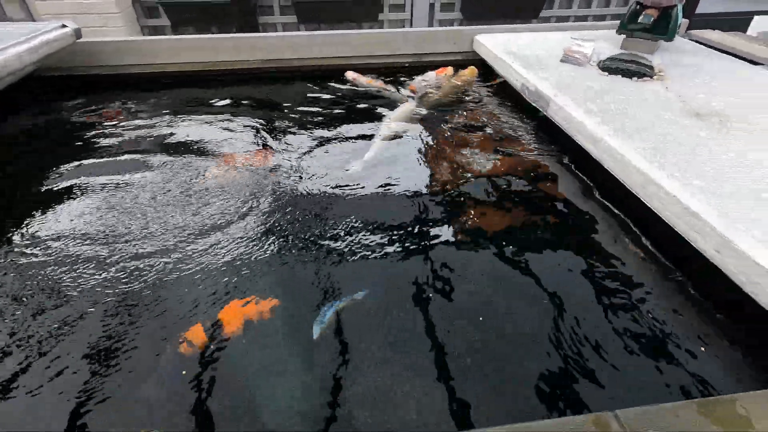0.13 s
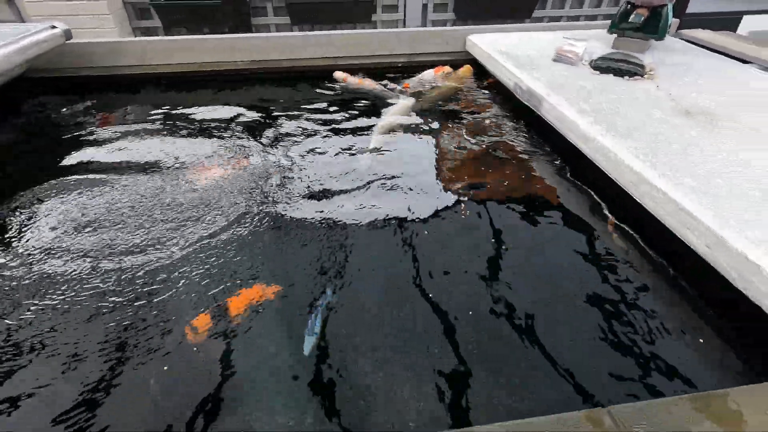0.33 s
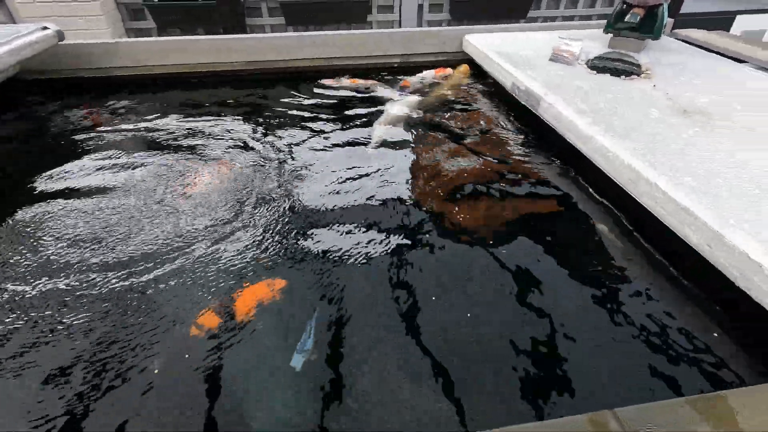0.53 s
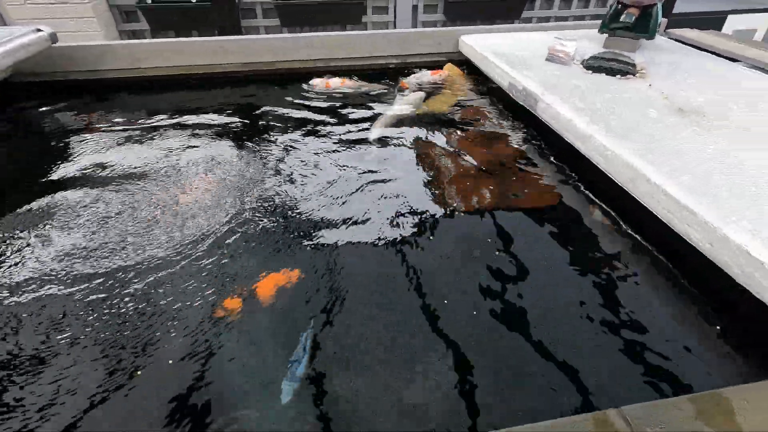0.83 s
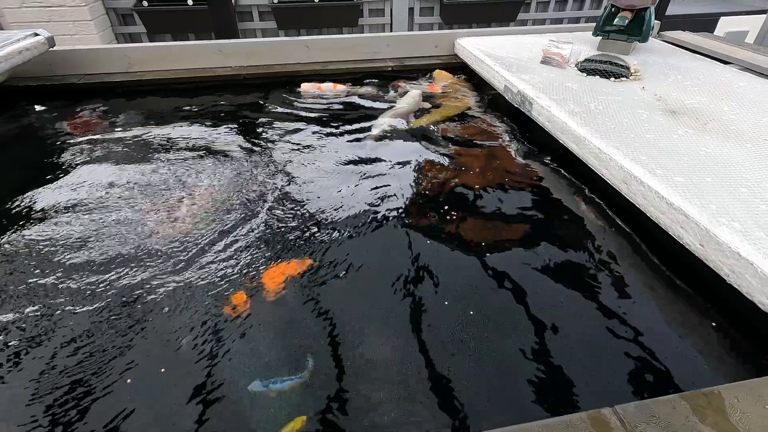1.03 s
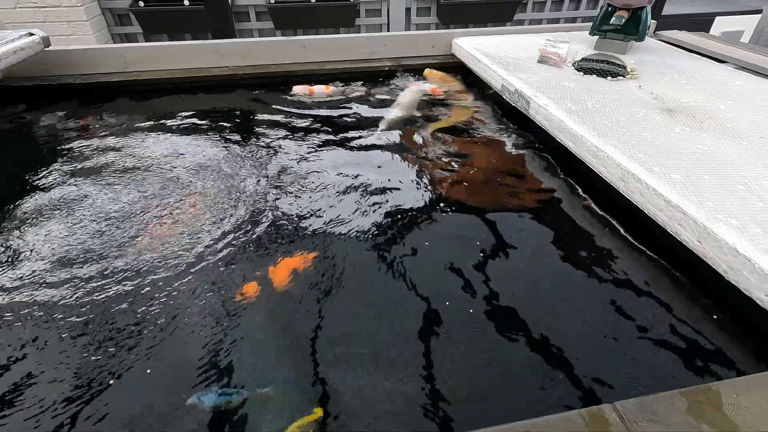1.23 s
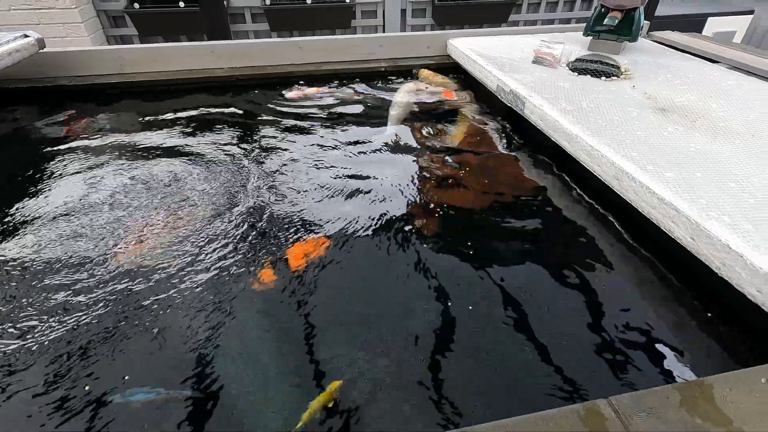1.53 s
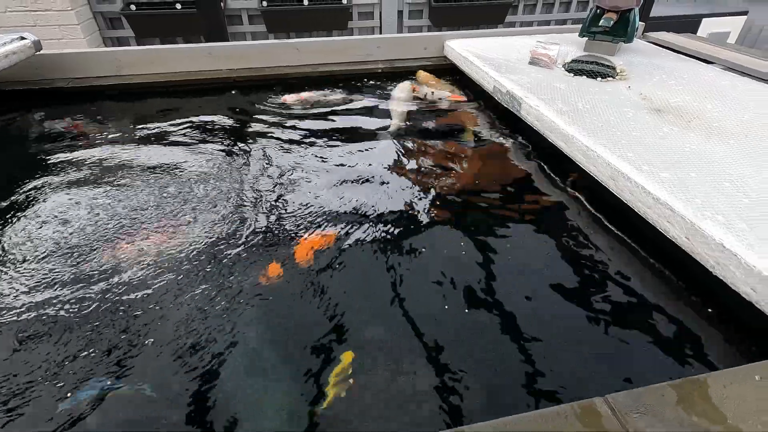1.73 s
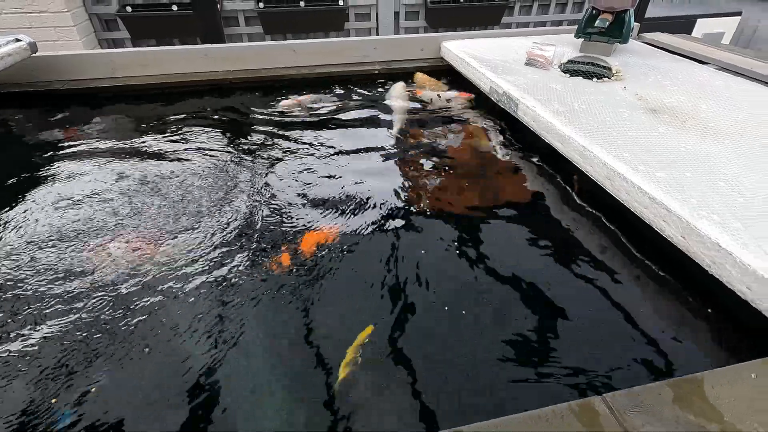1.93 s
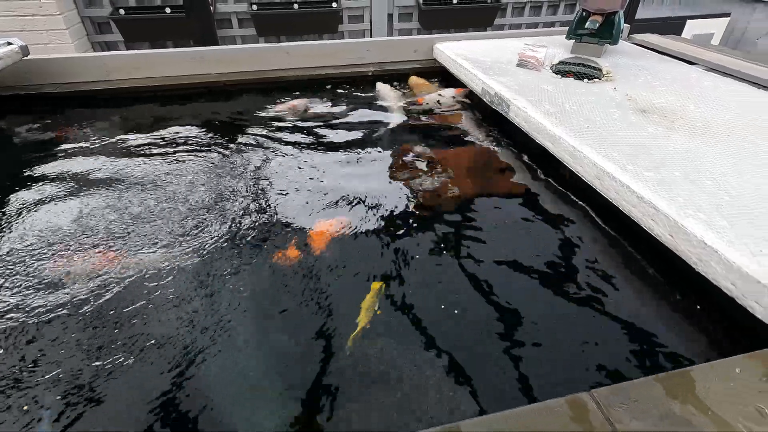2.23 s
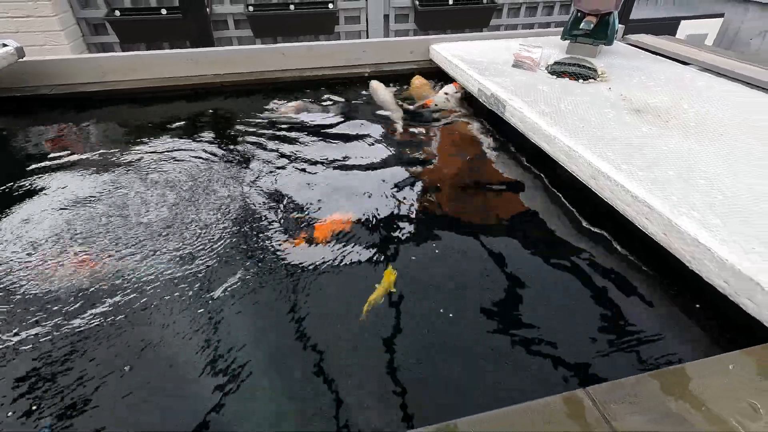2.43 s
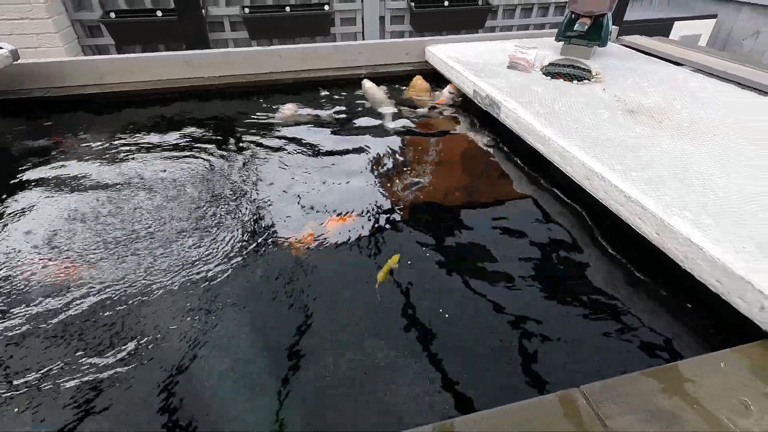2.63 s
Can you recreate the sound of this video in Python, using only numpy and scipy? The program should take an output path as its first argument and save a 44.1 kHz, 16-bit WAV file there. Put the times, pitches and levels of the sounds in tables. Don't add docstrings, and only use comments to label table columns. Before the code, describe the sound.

Fish gulp and flick at a pond surface, making ringing bubbly plops and small splashes, busiest in the first second with one sharp slap, then sparser, over constant trickling and pump hum; close outdoor stereo microphone.

```python
import sys
import numpy as np
from scipy import signal
from scipy.fft import rfft, irfft, next_fast_len
from scipy.io import wavfile
from scipy.ndimage import uniform_filter1d, map_coordinates

SR = 44100
rng = np.random.default_rng(int(sys.argv[2]) if len(sys.argv) > 2 else 0)


def makeup_ratio(level_db):
    decades = np.asarray(level_db, float) / 20
    return 10 ** decades


def digitize_waveform(pressure):
    field = np.atleast_2d(pressure).T
    bounded = np.clip(field, -1, 1)
    quanta = np.round(bounded * 32767).astype(np.int16)
    wavfile.write(sys.argv[1], SR, quanta)


N = 123479

# start in seconds, peak in dB, pitch in Hz.
GULPS = [(0.334, -27, 630), (0.496, -23.5, 488), (0.588, -32, 538), (0.634, -33, 457), (0.744, -29.5, 512),
         (0.863, -25.5, 523), (0.943, -28.5, 746), (.942, -29, 502), (.941, -30, 1007), (1.109, -35.5, 445),
         (1.171, -34, 557), (1.535, -26, 357), (1.96, -36, 543), (2.283, -37.5, 660), (2.641, -26, 677)]
# start in seconds, peak in dB, pitch in Hz, cycles to die.
PLOPS = [(0.047, -27.5, 1040, 25), (0.117, -21, 1290, 13), (0.254, -29.5, 994, 23), (0.309, -32, 1870, 69),
         (0.336, -20.5, 960, 8.9), (0.372, -23, 1242, 33), (0.422, -32.5, 981, 77), (0.447, -23.5, 995, 29),
         (0.543, -28.5, 1002, 37), (0.568, -25.5, 1050, 24), (0.624, -26.5, 1730, 48),
         (0.664, -28.5, 1450, 21), (0.771, -24.5, 1046, 24), (0.886, -27, 1217, 31), (0.912, -27, 1205, 32),
         (0.939, -26, 1930, 14), (0.943, -18.5, 1890, 35), (1.026, -27.5, 1630, 21), (1.106, -32, 984, 70),
         (1.226, -30, 1040, 31), (1.287, -23.5, 1390, 30), (1.441, -33.5, 1230, 43), (1.543, -27, 978, 32),
         (1.822, -30, 1224, 45), (2.284, -24, 938, 24), (2.704, -27, 1786, 42), (2.785, -34.5, 1960, 32)]
# start in seconds,
# peak in dB, pitch in Hz, cycles to die.
DROPS = [(0.118, -24, 3100, 9.7), (0.18, -40.5, 2810, 28), (0.3705, -34, 2590, 31), (0.4338, -24, 3320, 21),
         (0.4458, -27, 2900, 29), (0.4805, -37, 3480, 42), (0.8882, -35, 3470, 47),
         (0.9395, -6.5, 2810, 12.7), (1.1037, -35.5, 2780, 42), (1.3115, -28.5, 4560, 34),
         (1.3924, -27, 3480, 11), (1.396, -27.5, 2590, 39), (1.4216, -25.5, 2530, 57),
         (1.6558, -37.5, 3820, 44), (1.7785, -30, 2600, 12), (1.7918, -34, 4280, 40),
         (2.1888, -41, 4150, 36), (2.6456, -13.5, 3700, 15), (2.7278, -38, 4120, 40),
         (2.7555, -41, 2430, 51),
         (0.019, -42, 6700, 20), (0.0834, -43, 3230, 28), (0.2186, -37, 2600, 10), (.2304, -38, 2490, 30),
          (.2823, -36, 3830, 14), (.411, -40, 3710, 22), (0.417, -39, 5000, 36), (0.4253, -28.5, 2900, 20),
          (.447, -42, 8500, 30), (0.486, -38, 6800, 34), (.5177, -45, 3400, 48), (.604, -29.5, 4860, 8),
          (.647, -37, 4570, 27), (.712, -31, 6200, 27), (0.9372, -17, 2180, 9), (0.942, -22, 4620, 27),
          (0.9437, -12.5, 2500, 10.4), (0.948, -32, 4640, 20), (.957, -35, 3700, 20),
          (0.959, -41, 4900, 39), (.9655, -41, 2780, 16), (.9745, -38, 2450, 50), (1.071, -34, 5550, 16),
          (1.08, -37, 6800, 12), (1.1305, -38, 6040, 33), (1.141, -37.5, 7600, 20), (1.3394, -38, 2460, 14),
          (1.433, -37.5, 4970, 34), (1.6404, -37, 7500, 19), (1.704, -35.5, 6740, 14),
          (1.9059, -33.5, 6900, 20), (1.9927, -40, 3350, 25), (1.993, -45, 8900, 60),
          (2.0644, -33, 3300, 5.7), (2.1244, -39.5, 2610, 32), (2.1457, -38.5, 1700, 12),
          (2.245, -32, 5000, 12), (2.2712, -37.5, 6800, 18), (2.6565, -36, 3800, 16),
          (2.662, -46, 3720, 30), (2.669, -34, 7800, 22), (2.6785, -39, 1890, 40), (1.091, -31.5, 1400, 22),
          (1.73, -32, 855, 9.9), (2.244, -31, 900, 8.3), (2.409, -37, 900, 30), (2.731, -34.5, 1310, 7.9),
          (2.323, -37.5, 416, 16)]
# start in seconds, peak in dB, pitch in Hz.
TICKS = [
    (0.629, -22.5, 6350),
    (0.9392, -27.5, 7400),
    (1.7681, -34.5, 7577),
    (1.8942, -37, 7000),
    (2.622, -31, 11700),
]
# start in seconds, peak in dB, first pitch in Hz, last pitch in Hz,
# length in seconds.
GLIDES = [
    (0.34, -37, 720, 1050, 0.047),
    (1.171, -29.5, 970, 2060, 0.0172),
    (1.96, -42, 800, 1860, 0.044),
    (2.025, -41, 734, 1660, 0.036),
    (.53, -41, 1300, 1500, 0.09),
]
# start in seconds, peak in dB, first pitch in Hz, last pitch in Hz,
# length in seconds.
SWISHES = [
    (.66, -53, 4000, 4500, .14),
    (.69, -57, 3400, 3500, .08),
    (1.7, -56, 3000, 4300, .12),
]
# start in seconds, peak in dB, spray length in seconds, centre pitch in Hz.
SLAPS = [(.001, -37, 0.021, 1250), (0.229, -40.5, 0.11, 2096), (0.414, -41, 0.056, 2800),
         (0.625, -41, 0.048, 2230), (0.935, -27, 0.025, 1990), (1.172, -44.5, 0.05, 2500),
         (1.429, -43.5, 0.083, 1800), (1.543, -43, 0.04, 2080), (1.916, -38, 0.026, 1300),
         (2.277, -39.5, 0.037, 878), (2.588, -47.5, 0.044, 1330), (2.621, -48, 0.024, 1780),
         (2.142, -48, 0.033, 3000), (2.6397, -34, .011, 1200), (2.645, -38.5, 0.045, 2230)]
# frequency in Hz, level in dB per Hz.
SPRAY_COLOUR = [(1500, -120), (2500, -15), (4500, 4), (8000, -3), (13000, -5), (15500, -42)]
# time in seconds, level in dB.
STIR = [(0, -65.5), (.15, -57), (.3, -48), (.45, -47), (.52, -53.5), (.62, -49), (.9, -50), (1.3, -54),
        (1.9, -56.5), (2.5, -53), (2.8, -53.5)]
# count, centre pitch in Hz, pitch spread in octaves, cycles to die,
# level over the stir in dB, level spread in dB.
CROWDS = [(1200, 1147, 0.38, 30, -1, 3.8), (900, 3570, 0.61, 25, -5, 4.2),
          (300, 429.0, 0.402, 18.8, 4.0, 3.3), (700, 7500, 0.63, 12.4, -3, 4.1)]
# time in seconds, level in dB.
HUM = [(0, -45.5), (.3, -42), (.45, -40.5), (.8, -37.5), (1, -43), (2, -39.5), (2.05, -34), (2.18, -35),
       (2.23, -37.5), (2.8, -42.5)]
# frequency in Hz, level in dB rms.
MAINS = [(49.7, -62), (199.8, -51)]
# start in seconds, length in seconds, first pitch in Hz, last pitch in Hz, level in dB.
BIRD = [
    (2.08, .085, 10750, 11050, -67),
    (2.395, .09, 11050, 11250, -67),
    (2.47, .08, 10950, 11250, -71),
    (2.53, .06, 11300, 10600, -68),
    (2.4, .09, 12750, 12800, -72),
]
# frequency in Hz, level in dB per Hz.
AIR = [(150, 5), (250, 0.5), (809, -12.5), (961, -7.5), (3060, -23), (6880, -19), (12400, -53),
       (13700, -78), (15500, -89)]
# frequency in Hz, level in dB per Hz.
RUMBLE = [(8, -17), (25, 0.5), (60, -1.5), (180, -3.5), (260, -16), (400, -38.5)]
# frequency in Hz, likeness of left and right from 0 to 1.
ALIKE = [(30, .1), (90, .93), (500, .93), (2000, .85), (4000, .72), (8000, .85), (12000, .4)]
# delay in seconds, level in dB.
WALLS = [
    (.0043, -12),
    (0.012, -17.5),
]
# frequency in Hz, left over right in dB.
TILT = [(30, 1.5), (300, 0), (2000, -2.5), (4500, -.5), (12000, 5)]

GULP_CYCLES, TICK_CYCLES = 24, 30
RISE, ATTACK_SHARE = 0.044, 0.034
WARBLE_DB = 1.3
SLAP_OCTAVES, SPRAY_DB, SPRAY_SIZE_DB = 0.569, -10.5, 4
HUM_HZ, HUM_TURN = 120.2, .09
PUFF_S, PUFF_DB, PUFF_HZ, PUFF_LEN_S = 2.17, -26.5, 38.6, 0.027
AIR_DB, RUMBLE_DB = -50, -48
YARD_T60_S, YARD_DB = 0.12, -7.5
LAG_S, ROLL_HZ = 2e-5, 13900


def unit(x):
    return x / np.sqrt(np.mean(x ** 2) + 1e-20)


def along(points, hz):
    f, v = np.transpose(points)
    return np.interp(np.log(hz + 1), np.log(f + 1), v)


def level_curve(points):
    s, db = np.transpose(points)
    return np.interp(np.arange(N) / SR, s, db)


def wobble(rate):
    knots = rng.standard_normal(3000)
    return map_coordinates(knots, [np.arange(N) * min(rate, 1000) / SR])


def filtered(x, response):
    m = next_fast_len(N + SR // 2)
    return irfft(rfft(x, m) * response(np.fft.rfftfreq(m, 1 / SR)), m)[..., :N]


def rush(spectrum, patchy_db):
    z = signal.stft(rng.standard_normal((2, N)), nperseg=512)[2]
    patches = uniform_filter1d(rng.standard_normal(z.shape[1:]), size=24, axis=0)
    patches = uniform_filter1d(patches, size=3, axis=1)
    pair = signal.istft(z * makeup_ratio(patchy_db * unit(patches)), nperseg=512)[1][:, :N]

    def mid_side(hz):
        turn = np.arccos(np.clip(along(ALIKE, hz), -1, 1)) / 2
        return makeup_ratio(along(spectrum, hz)) * [np.cos(turn), np.sin(turn)]

    mid, side = filtered(pair, mid_side)
    return unit(np.array([mid + side, mid - side]))


def bubbles(s, db, hz, cycles, rise, pan_db, size):
    s, db, hz, cycles, pan_db = (np.broadcast_to(v, np.shape(s))[:, None] for v in (s, db, hz, cycles, pan_db))
    k = np.arange(size)
    turns = k / SR * np.clip(hz, 100, 14000)
    decay = makeup_ratio(db - 60 * turns / cycles)
    swell = (1 - np.exp(-turns / (ATTACK_SHARE * cycles))) ** 2
    ring = decay * swell * np.sin(2 * np.pi * turns * (1 + rise * turns / cycles))
    at = (np.round(np.clip(s, 0, N / SR) * SR).astype(int) + k).ravel()
    sides = []
    for side in (1, -1):
        placed = (ring * makeup_ratio(side * pan_db / 2)).ravel()
        sides.append(np.bincount(at, placed, N + size + 1)[:N])
    return np.array(sides)


def whistle(s, db, from_hz, to_hz, length):
    u = np.clip((np.arange(N) / SR - s) / length, 0, 1)
    turns = length * (from_hz * u + (to_hz - from_hz) * u * u / 2) + .12 * wobble(120)
    arch = np.sqrt(np.sin(np.pi * u) * (1 - u))
    return makeup_ratio(db + 1.7 * wobble(90)) * arch * np.sin(2 * np.pi * turns)


def feeding():
    gulps = [(*row, GULP_CYCLES) for row in GULPS]
    ticks = [(*row, TICK_CYCLES) for row in TICKS]
    rows = np.array(gulps + PLOPS + DROPS + ticks, float)
    pan_db = 2.0 * rng.standard_normal(len(rows))
    rings = bubbles(*rows.T, RISE, pan_db, size=4096) * makeup_ratio(WARBLE_DB * wobble(180))
    necks = sum(whistle(*row) for row in GLIDES)
    froth = sum(whistle(*row) * wobble(1000) for row in SWISHES)
    return rings + necks + froth


def slaps():
    out, t = np.zeros((2, N)), np.arange(N) / SR
    sputter = makeup_ratio(6 * wobble(350))
    spray = unit(sputter * rush(SPRAY_COLOUR, patchy_db=3.5))
    for s, db, length, centre_hz in SLAPS:
        when = rng.random(48)
        pitch, size, pan = rng.standard_normal((3, 48))
        octaves = SLAP_OCTAVES * np.sqrt(centre_hz / 2200) * np.clip(pitch, -2, 1.6)
        peak_db = db - 11 * when + SPRAY_SIZE_DB * size
        out += bubbles(s + length * when ** 1.2, peak_db, centre_hz * 2 ** octaves, 22.8, RISE, 4.0 * pan, size=1024)
        u = np.maximum(t - s, 0) / length
        spray_db = db + SPRAY_DB + 8.2 * np.log2(centre_hz / 2200) - 15.4 * u
        out += spray * makeup_ratio(spray_db) * (1 - np.exp(-6 * u))
    return out


def trickle():
    stir_db = level_curve(STIR)
    out = np.zeros((2, N))
    for count, centre_hz, octaves, cycles, over_db, spread_db in CROWDS:
        s = rng.random(count) * N / SR
        pitch, pan = rng.standard_normal((2, count))
        big = np.minimum(rng.exponential(size=count), 2.5)
        db = stir_db[(s * SR).astype(int)] + over_db + spread_db * big
        hz = centre_hz * 2 ** (octaves * pitch)
        out += bubbles(s, db, hz, cycles, 0.16, 1.6 * pan, size=1024)
    return out


def pump():
    t = np.arange(N) / SR
    sides = HUM_TURN * np.array([[1], [-1]])
    level_db = level_curve(HUM) + .7 * wobble(20)
    hum = makeup_ratio(level_db) * np.sin(2 * np.pi * HUM_HZ * t + .3 * wobble(8) + sides)
    lines = 0
    for hz, db in MAINS:
        lines = lines + makeup_ratio(db + 0.72 * wobble(12.4)) * np.sin(2 * np.pi * hz * t + 0.19 * wobble(9.2))
    return np.sqrt(2) * (hum + lines)


def bird():
    return sum(whistle(s, db, from_hz, to_hz, length) for s, length, from_hz, to_hz, db in BIRD)


def puff():
    u = (np.arange(N) / SR - PUFF_S - PUFF_LEN_S / 2) / PUFF_LEN_S
    push = makeup_ratio(PUFF_DB) * np.exp(-3 * u * u) * np.sin(2 * np.pi * PUFF_HZ * PUFF_LEN_S * u)
    return push * makeup_ratio([[1.5], [-1.5]])


def air():
    stir_db = level_curve(STIR)
    hiss_db = AIR_DB + 0.5 + 0.12 * (stir_db - stir_db.mean()) + 2.8 * wobble(60)
    hiss = makeup_ratio(hiss_db) * rush(AIR, patchy_db=4.0)
    rumble = makeup_ratio(RUMBLE_DB + 2.2 * wobble(6.58)) * rush(RUMBLE, patchy_db=1.0)
    return hiss + rumble


def yard(x):
    t = np.arange(SR // 3) / SR
    tail = rng.standard_normal((2, len(t))) * makeup_ratio(-60 * t / YARD_T60_S) * (t > .006)
    tail = makeup_ratio(YARD_DB) * tail / np.linalg.norm(tail[0])
    for delay, db in WALLS:
        tail[:, round(delay * SR)] += makeup_ratio(db)
    return x + signal.fftconvolve(x, tail, axes=1)[:, :N]


def scene():
    water = feeding() + slaps() + trickle()
    return yard(water) + pump() + bird() + puff() + air()


def low_pass(x):
    return signal.sosfilt(signal.butter(12, 15730, fs=SR, output="sos"), x)


def record(dry):
    half = np.array([[.5], [-.5]])

    def port(hz):
        colour = makeup_ratio(along(TILT, hz) * half)
        lag = np.exp(-2j * np.pi * hz * LAG_S * half)
        return colour * lag / (1 + (hz / ROLL_HZ) ** 12)

    return low_pass(filtered(dry, port))


dry = scene()
out = record(dry)
digitize_waveform(out)
```